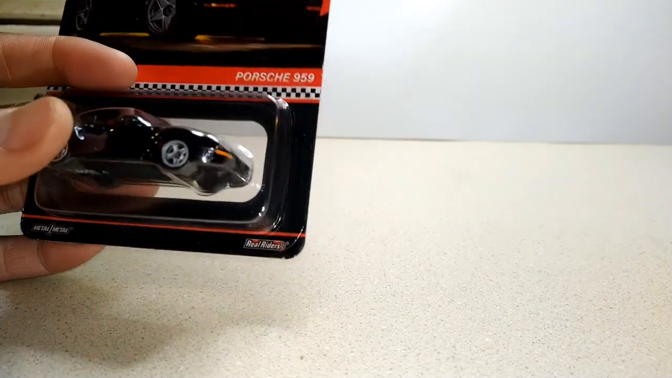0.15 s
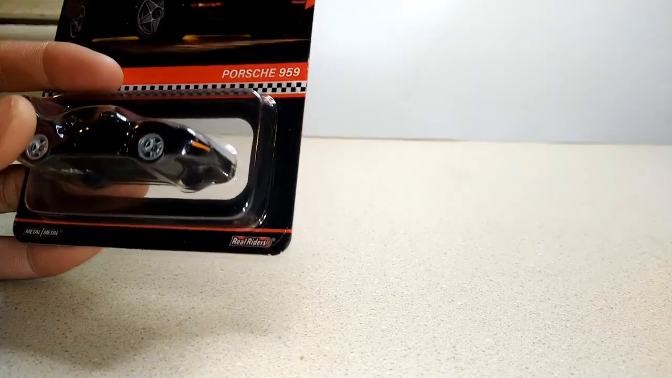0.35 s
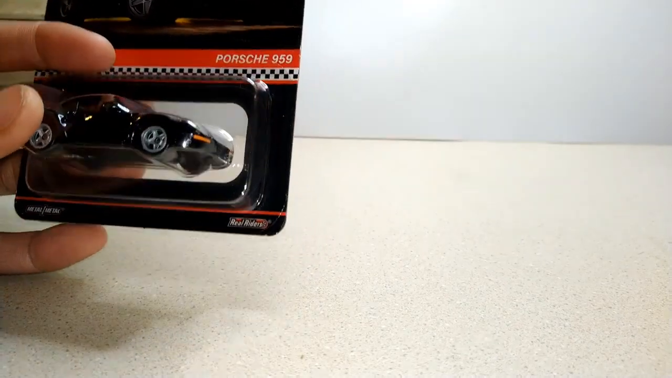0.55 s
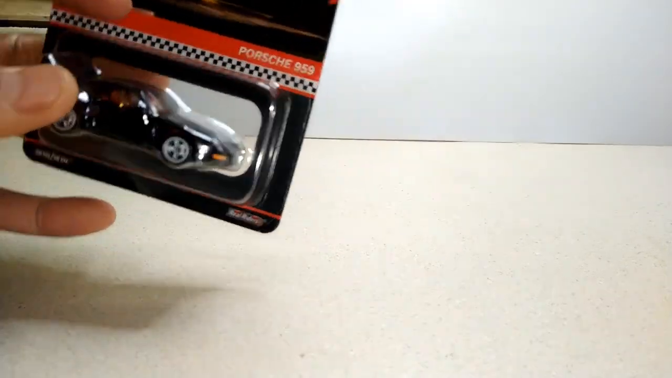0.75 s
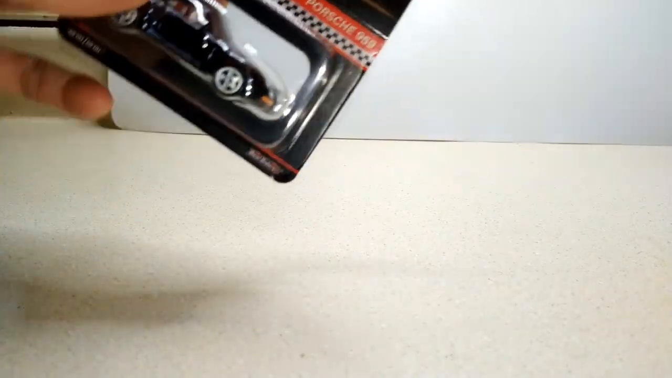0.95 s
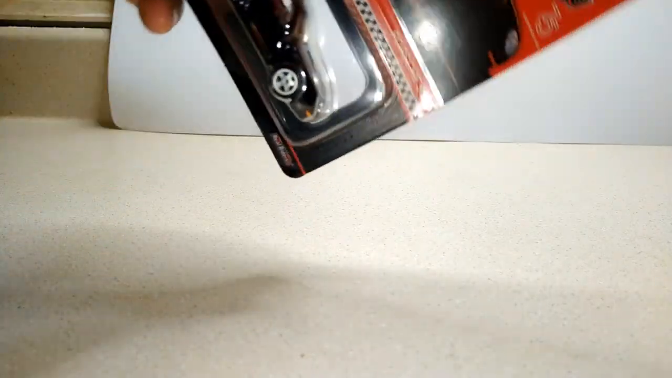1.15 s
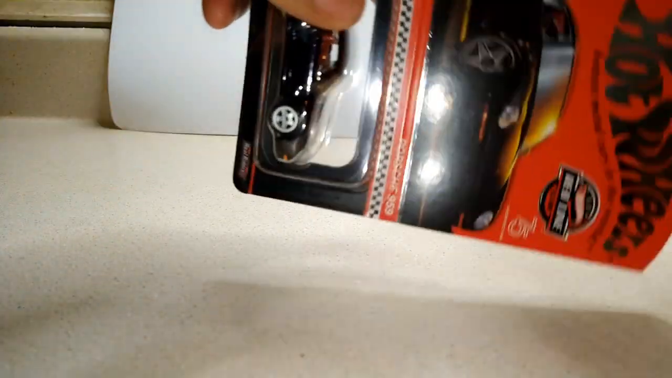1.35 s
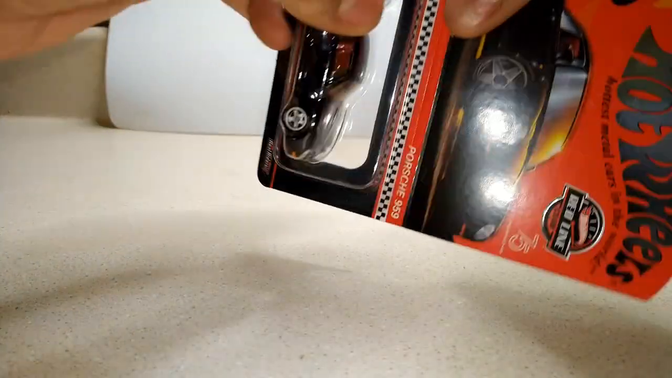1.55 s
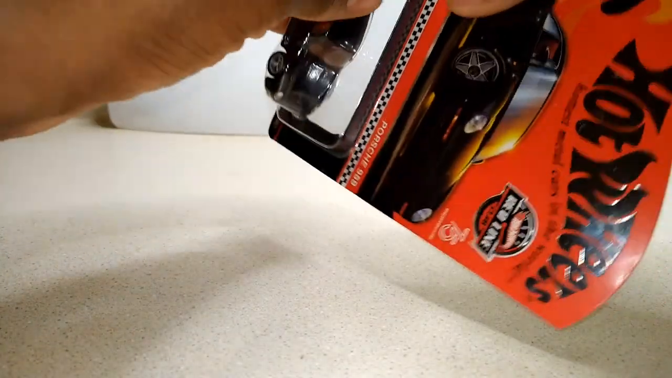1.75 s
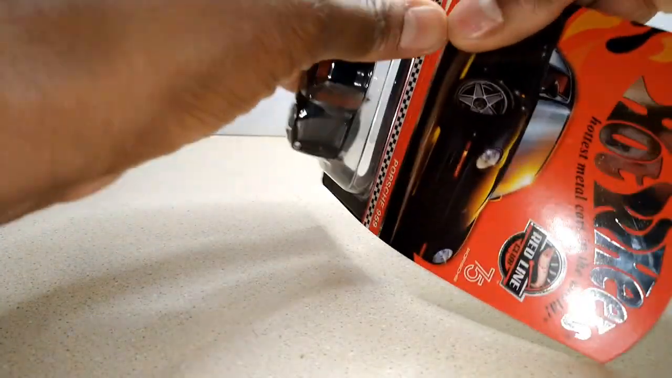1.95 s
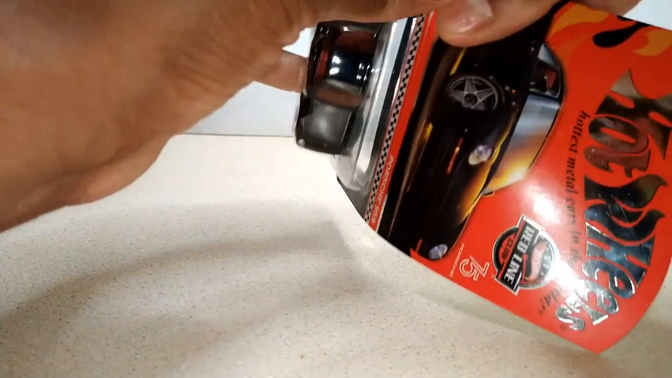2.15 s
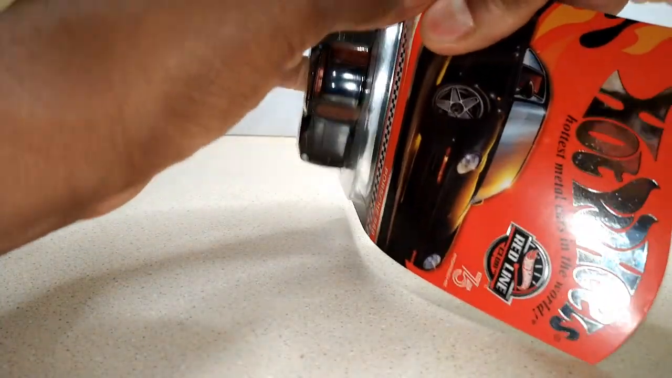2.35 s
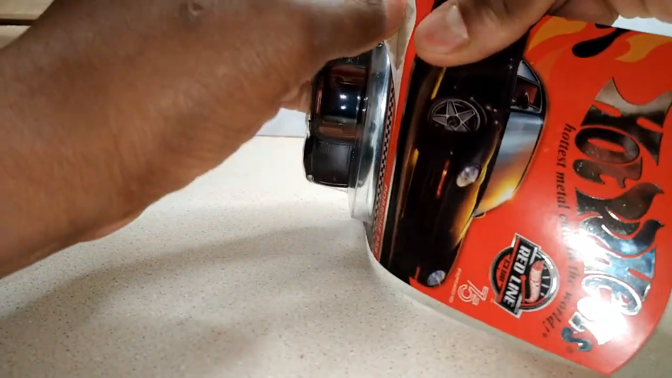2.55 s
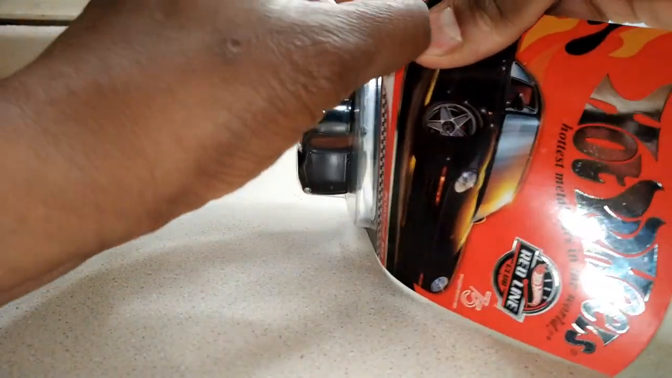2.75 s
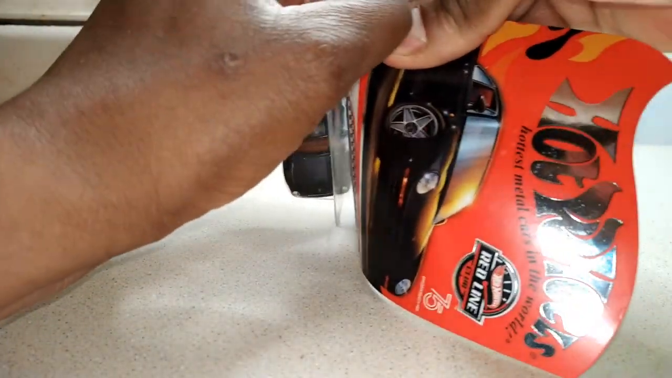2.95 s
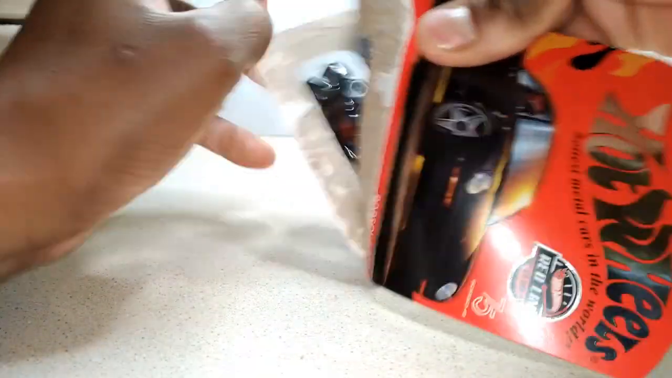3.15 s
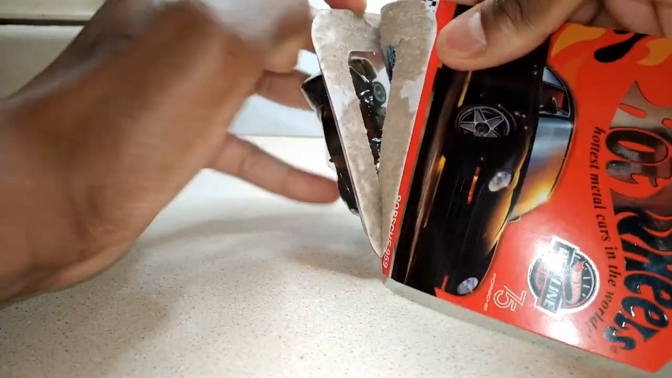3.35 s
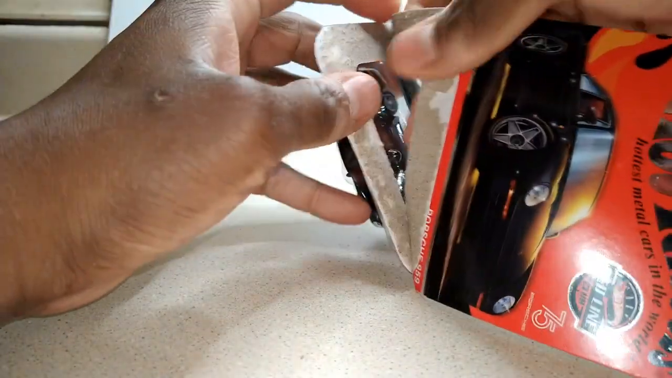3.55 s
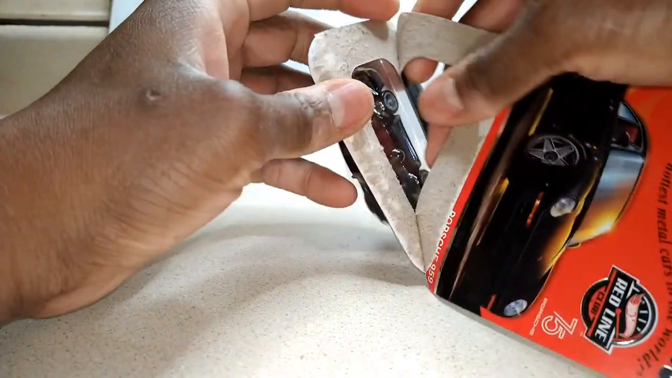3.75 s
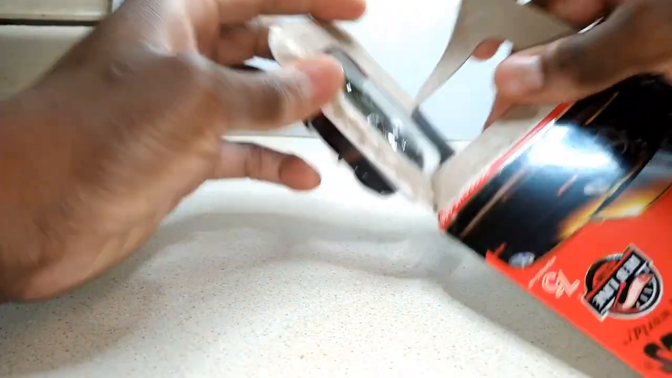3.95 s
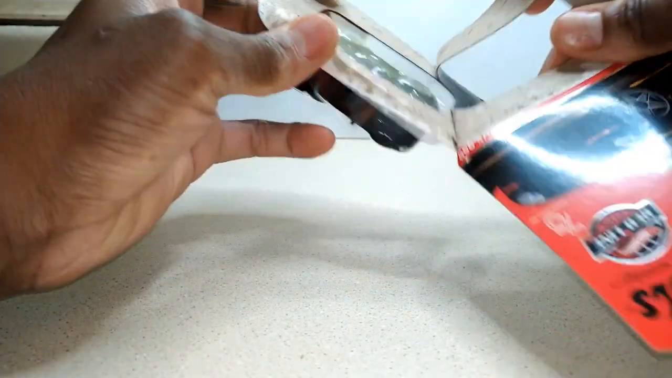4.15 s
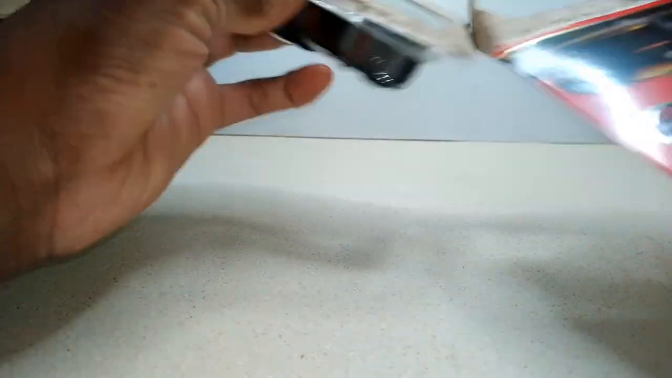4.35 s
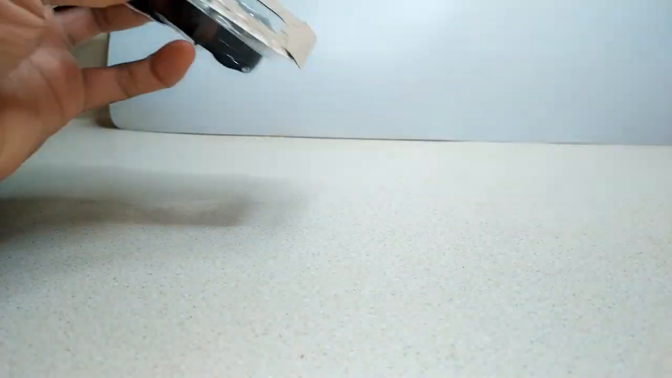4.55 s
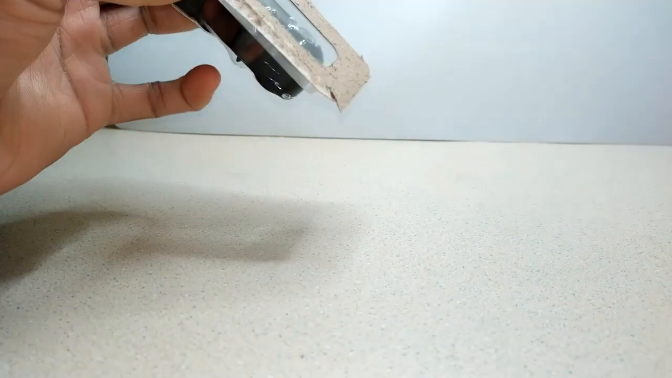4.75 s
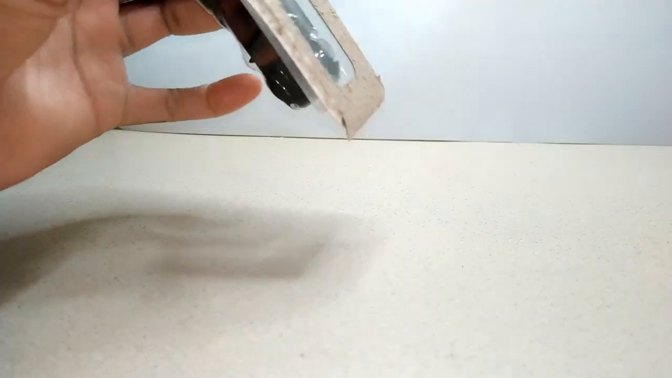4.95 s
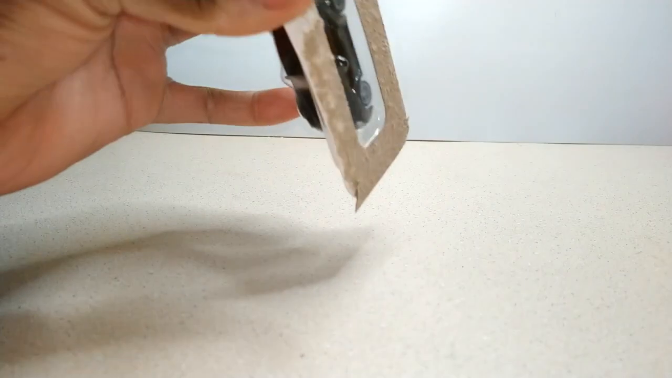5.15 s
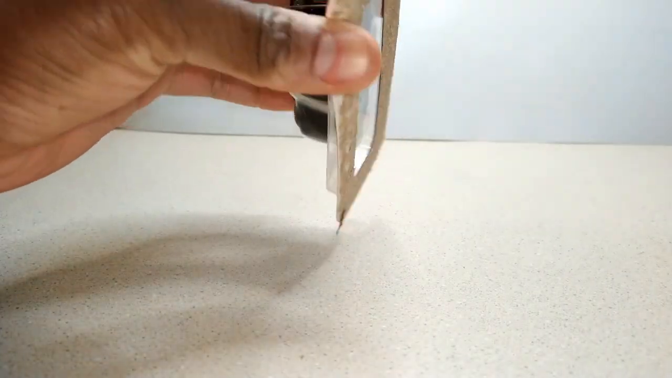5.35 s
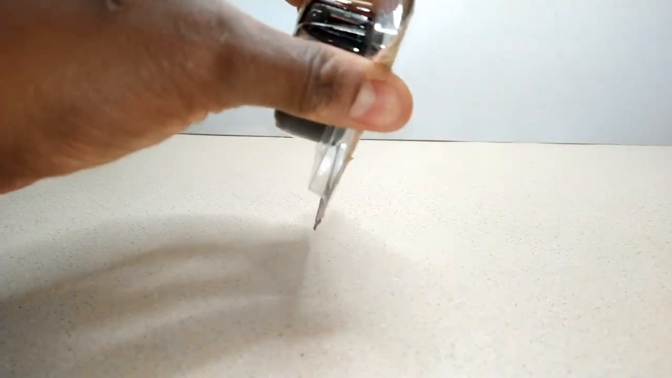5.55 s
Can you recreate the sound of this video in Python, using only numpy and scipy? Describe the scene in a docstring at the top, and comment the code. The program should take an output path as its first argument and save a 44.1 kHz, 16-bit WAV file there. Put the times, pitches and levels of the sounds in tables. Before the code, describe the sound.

Stiff plastic pops and crackles in bursts as glued cardboard rips by hand, a small toy knocking inside its shell, over faint room hum.

```python
"""Hands turn a carded blister pack close to a two-port microphone, over the low hum and hiss of a quiet room.
First a faint rub, then buckling plastic snaps (noise bursts through resonances), and the toy knocks the shell
(struck decaying modes). Snaps then crowd together while fingers rub the card and glued paper rips in random grains.
Near four seconds the shell is off and the card's lowest resonance weakens; loud snaps and a short rip follow.
Sparser snaps and rubbing end the scene. Thumps of the hands and card are damped sines."""
import sys
import numpy as np
from scipy import signal
from scipy.fft import rfft, irfft, next_fast_len
from scipy.io import wavfile
from scipy.ndimage import map_coordinates

SR = 44100
rng = np.random.default_rng(int(sys.argv[2]) if len(sys.argv) > 2 else 0)


def linear_from_db(decibels):
    """Turn decibels (scalar or array-like) into linear amplitude factors; 0 gives 1."""
    return 10 ** (np.asarray(decibels, float) / 20)


def output_pcm(signal):
    """Save a mono or channel-first signal as 16-bit PCM at the path in sys.argv[1].

    Samples are clipped to [-1, 1] before scaling.
    """
    pcm = np.clip(np.atleast_2d(signal).T, -1, 1) * 32767
    wavfile.write(sys.argv[1], SR, np.round(pcm).astype(np.int16))


N = 246959  # samples, 5.6 s


def unit_rms(x):
    """Energy normalisation: scales a signal to rms 1."""
    return x / np.sqrt(np.mean(x ** 2) + 1e-20)


def unit_peak(x):
    """Peak normalisation: the rms over both channels peaks at 1 in each event."""
    power = np.mean(x ** 2, axis=1)
    return x / np.sqrt(power.max(-1))[:, None, None]


def spectrum_gain(points, hz):
    """Spectral shaping: gain of (frequency [Hz], level [dB]) points on a log axis, -120 dB outside them."""
    f, level_db = np.transpose(points)
    return linear_from_db(np.interp(np.log(hz + 1), np.log(f + 1), level_db, -120, -120))


def modes(table, f):
    """Modal superposition: damped resonances (centre [Hz], width [Hz], level [dB]) of alternating sign."""
    total = 0
    for k, (centre, width, db) in enumerate(table):
        resonance = 1j * f * width / (centre * centre - f * f + 1j * f * width)
        total = total + (-1) ** k * linear_from_db(db) * resonance
    return total


# treble resonances of the left and the right microphone port: (centre [Hz], width [Hz], level [dB])
PORT_MODES = [
    [(6566, 750, 11), (4550, 4100, -3.5)],
    [(5040, 665, 10.5), (5930, 2750, -6.5)],
]


def ports(f, skirt_db):
    """Port resonance: each port lifts its own treble band over a flat skirt."""
    return np.array([modes(port, f) + linear_from_db(skirt_db) for port in PORT_MODES])


def curves(rows):
    """Linear interpolation: one value per sample for each column after the time."""
    s, *columns = np.transpose(rows)
    return [np.interp(np.arange(N) / SR, s, column) for column in columns]


def wobble(rate):
    """Slow random modulation: a smooth curve through random knots, rate knots a second."""
    knots = rng.standard_normal(int(N * rate / SR) + 4)
    return map_coordinates(knots, [np.arange(N) * rate / SR])


def filtered(x, response):
    """Linear filtering: the spectrum times a complex response of frequency."""
    n = x.shape[-1]
    m = next_fast_len(n + 2048)
    return irfft(rfft(x, m) * response(np.fft.rfftfreq(m, 1 / SR)), m)[..., :n]


def noise_pair(shape, alike):
    """Partial coherence: left and right noise whose correlation is alike."""
    a, b = rng.standard_normal((*shape[:-1], 2, shape[-1])).swapaxes(0, -2)
    angle = np.arccos(np.clip(alike, -1, 1)) / 2
    shared, apart = np.cos(angle) * a, np.sin(angle) * b
    return np.stack([shared + apart, shared - apart], -2)


def sides(pan_db):
    """Interaural level difference: left and right gains that share a left-right difference."""
    axis = -2 if np.ndim(pan_db) > 1 else 0
    return linear_from_db(np.stack([pan_db, -pan_db], axis) / 2)


def place(times, sounds):
    """Superposition: sums stereo events at their times."""
    out = np.zeros((2, N + sounds.shape[-1]))
    for s, x in zip(times, sounds):
        out[:, round(s * SR):][:, :x.shape[-1]] += x
    return out[:, :N]


def burst(count, crack_s, near_db, near_s, room_db, room_s, alike):
    """Direct sound and reverberation: a crack, echoes off hands and table, a new room tail for every event."""
    t = np.arange(SR // 6) / SR
    # each decay time [s] spans 60 dB
    crack = noise_pair((count, len(t)), alike) * linear_from_db(-60 * t / crack_s)
    echoes = linear_from_db(near_db - 60 * t / near_s) + linear_from_db(room_db - 60 * t / room_s)
    onset = 1 - np.exp(-t / 0.00074)
    return crack + noise_pair((count, len(t)), alike ** 4) * echoes * onset


# snaps of the plastic: (time [s], click level [dB], card body re click [dB],
# pitch of the buckled patch [Hz], left-right difference [dB])
SNAP_EVENTS = [(0.1741, -57, -2, 590, -2.5), (0.4249, -60, 0, 552, -6), (0.616, -38, -2, 466, -5.5),
               (0.6759, -16, -20.5, 501, -3.5), (0.6796, -18, -15, 1930, 0.5), (0.6944, -30, -16, 501, -7),
               (0.7044, -34, -10, 546, -6), (1.2475, -47.5, 6.5, 2000, -4),
               (1.3469, -33.5, -9.5, 501, -7.5), (1.3569, -34, -11, 530, -10.5),
               (1.437, -55.5, -2, 726, -1.5), (1.5334, -42.5, -9, 692, -3.5), (1.5655, -41, -16, 614, -5.5),
               (1.5754, -44, -1.5, 546, -1), (1.6226, -25, -7, 676, -1.5), (1.6998, -42, -15, 778, -5),
               (1.7054, -35.5, -29, 775, 0.5), (1.7724, -50.5, -4, 1420, 6),
               (1.8451, -46.5, 5.5, 1770, 3.5), (1.862, -45, -11, 1500, 4), (1.9203, -52, 7, 1130, 4),
               (1.9401, -33, -26, 872, 2), (1.9544, -33.5, -12, 750, 4), (1.9637, -33, -17, 1130, -2.5),
               (1.9855, -39, -9.5, 1120, -2.5), (1.9967, -37, -15, 1020, -2.5), (2.0453, -35, -23, 1880, 1),
               (2.1156, -26.5, -23, 1890, 2), (2.1284, -31, -11.5, 755, -0.5),
               (2.1503, -33.5, -14, 780, -1.5), (2.1669, -34.5, -11.5, 735, 2.5),
               (2.1819, -32, -10, 1880, 0.5), (2.1949, -31.5, -12, 820, -0.5),
               (2.2068, -24.5, -12, 505, -3), (2.225, -29.5, -19, 665, -0.5),
               (2.2459, -29.5, -11.5, 496, -2), (2.392, -27, -21.5, 1750, 2.5),
               (2.4356, -30.5, -21, 1890, 1), (2.5262, -28, -17, 1490, -0.5),
               (2.5364, -41, -5.5, 501, -6.5), (2.601, -24.5, -24, 830, -1.0),
               (2.671, -44, -12, 1120, -2.5), (2.693, -34.5, -14, 1900, -14.5),
               (2.7002, -32, -24, 1070, -12.5), (2.705, -35.5, -29, 1850, -7.5),
               (2.7134, -37, -31, 1090, -5), (2.7227, -31, -21, 2070, -5), (2.7316, -30.5, -26, 1090, -7),
               (2.747, -32, -26, 1900, -9), (2.7633, -32, -27, 807, -7.5),
               (2.7767, -31.5, -11.5, 760, -3.5), (2.8015, -44, -4, 600, -2), (2.823, -31, -25, 807, -12),
               (2.834, -33.5, -17, 725, -6.5), (2.8684, -40, -2.5, 530, -3.5), (2.9569, -33.5, -8, 870, -1),
               (3.102, -23, -22, 510, 3), (3.1204, -22.5, -15.5, 940, -1), (3.138, -34, -3, 1070, -6),
               (3.2018, -36, -1, 1120, -1.5), (3.2548, -29, -7, 726, -1.5), (3.2854, -33, 4.5, 810, 0.5),
               (3.3294, -52, -9, 677, 5), (3.3551, -31, -4, 1080, 7), (3.4705, -44, -5, 1300, -1),
               (3.5907, -36, -1.5, 715, -0.5), (3.6566, -47.5, 0, 600, 6), (3.695, -38, -3.5, 760, -0.5),
               (3.797, -44, -9, 1150, -5.5), (3.8102, -41, -3, 1170, 0), (3.8347, -36.5, -15.5, 573, -1.5),
               (3.8538, -46, -5, 690, 0.5), (3.8778, -33, -7, 600, 0.5), (3.9652, -29.5, 5, 732, 2.5),
               (3.9823, -16.5, -22, 1130, -2), (4.0065, -24.5, 4, 1260, 2.5),
               (4.1205, -48.5, -7, 1196, -1.5), (4.1326, -41, -12, 1100, 0), (4.1915, -35, -15, 845, 3.5),
               (4.2302, -34.5, -20, 784, 6.5), (4.3594, -58, -3, 616, 5), (4.422, -23, -24, 2170, 7),
               (4.4301, -20, -15.5, 1560, 5.5), (4.4444, -29.5, -6, 797, -1.5),
               (4.6705, -46, -0.5, 1940, -6.5), (4.8219, -52, -9, 1230, -2), (4.842, -40, -39, 1910, -2.5),
               (4.8855, -53.5, 1, 1300, 5.5), (4.9404, -45, -23, 1630, 8.5), (4.962, -45, -11, 1210, 9.5),
               (4.9772, -34.5, -9, 2820, 5.0), (4.9927, -39.5, -9.5, 730, 10), (5.1387, -46.5, -1, 1870, 4),
               (5.172, -49, -13, 610, 6), (5.2106, -46, -0.5, 1830, 7.5), (5.4238, -40.5, -11, 1770, 4),
               (5.5079, -33, -9.5, 1700, 6), (5.5433, -41, -13.5, 659, 10.5), (5.5835, -46, -14, 1100, 2)]
# dryness of the parting surfaces and place of the hands:
# (time [s], top end of the rip re its treble [dB], left-right difference [dB])
GRIP_PATH = [(0, -19, -3), (.6, -24, -1), (1.36, -32, -0.5), (1.6, -21.5, 5), (2.2, -22.5, 1),
             (2.43, -12, 5.5), (2.7, -27, 1), (3.0, -8.5, 3.5), (3.13, -14, 3), (3.3, -21.5, 3),
             (3.95, -15, 1.5), (4.3, -16.5, 4.5), (4.428, -17, 5), (4.7, -21, 0.5), (5.0, -17.5, 11),
             (5.6, -23, 7)]
# resonances of the flexed card: (centre [Hz], width [Hz], level [dB])
CARD_MODES = [(288, 134, 2.5), (689, 246, 1.5), (1130, 160, 0), (1917, 1170, -4), (2580, 3000, -13.5)]
# treble of paper and plastic: (frequency [Hz], relative level [dB])
FIBRE_SPECTRUM = [(2200, -4.5), (2900, -5), (3700, 4), (6000, 0.5), (8000, -3.5), (9500, -11.5),
                  (11000, -111)]
# brightest edge of the sound: (frequency [Hz], relative level [dB])
TOP_SPECTRUM = [(7500, -12), (9500, 13.5), (12500, 8), (15300, 3.5), (15600, -26)]
SNAP_DULLER_DB, SNAP_SCATTER_DB = -3.5, 4  # top end of a snap under that of the rip, and its scatter
PEELED_S = 3.9  # the shell is off


def snaps():
    """Snap-through buckling: a click through the ports, a thud in the card and the buckled patch."""
    s, db, body_db, hz, pan_db = np.transpose(SNAP_EVENTS)[..., None, None]
    grip_s, dry_db, _ = np.transpose(GRIP_PATH)
    scatter_db = SNAP_SCATTER_DB * rng.standard_normal(s.shape)
    top_db = np.interp(s, grip_s, dry_db) + SNAP_DULLER_DB + scatter_db

    # arrival times differ between the ports with the left-right difference
    lag_s = (1.2e-4 - 5e-5 * pan_db) * [[.5], [-.5]]
    later = lambda f: np.exp(-2j * np.pi * f * lag_s)

    blow = burst(count=len(s), crack_s=.006, near_db=-14, near_s=.022, room_db=-40, room_s=.22, alike=.6)
    click = unit_peak(filtered(blow, lambda f: later(f) * ports(f, -12.5) * spectrum_gain(FIBRE_SPECTRUM, f)))
    # the top end takes twice the lag
    top = unit_peak(filtered(blow, lambda f: later(f) ** 2 * spectrum_gain(TOP_SPECTRUM, f)))

    # a snap at the card's edge radiates little bass, and still less once the shell is off
    edge_hz = np.where(s < PEELED_S, 210, 420)
    radiated = lambda f: (1j * f / (edge_hz + 1j * f)) ** 2
    patch = [(hz, 0.26 * hz, 7)]
    push = burst(count=len(s), crack_s=.009, near_db=-12, near_s=.04, room_db=-38, room_s=.2, alike=.97)
    body = unit_peak(filtered(push, lambda f: later(f) * radiated(f) * (modes(CARD_MODES, f) + modes(patch, f))))

    mix = click + linear_from_db(top_db) * top + linear_from_db(body_db) * body
    return place(s.ravel(), mix * linear_from_db(db) * sides(pan_db[:, 0]))


def rip():
    """Fracture noise and friction: paper fibres part and skin drags; the card radiates the lower share."""
    loud, low = strokes()
    top_db, pan_db = curves(GRIP_PATH)
    fibres = grains(660, 1.73, 5.8, alike=0.1)
    crackle = unit_rms(filtered(fibres, lambda f: ports(f, -0.5) * spectrum_gain(FIBRE_SPECTRUM, f)))
    top = unit_rms(filtered(fibres, lambda f: spectrum_gain(TOP_SPECTRUM, f)))
    return sides(pan_db) * loud * (crackle + linear_from_db(top_db) * top) + low * card_crackle()


# strokes of rubbing and ripping: (time of the crest [s], crest level [dB], rise over 20 dB [s],
# fall over 20 dB [s], card body re crest [dB])
STROKE_EVENTS = [(.284, -65.5, 1, 0.64, -12.5), (0.624, -67.5, 0.0074, 0.032, 15.5),
                 (.69, -45.5, 0.011, 0.066, -4), (1.25, -62, 0.3, 0.22, -12), (1.358, -58, 0.018, 0.086, 2),
                 (1.56, -54.5, 0.042, 0.15, -2.5), (1.675, -52.5, 0.08, 0.056, 2.5),
                 (1.735, -55.5, 0.046, 0.04, -0.5), (1.864, -57.5, 0.17, 0.14, -10),
                 (1.967, -48, 0.045, 0.068, -7), (2.122, -55.5, 0.18, 0.19, -6.5),
                 (2.213, -47, 0.037, 0.068, -3.5), (2.425, -49, 0.094, 0.17, -14),
                 (2.54, -64, 0.13, 0.093, 6), (2.615, -56.5, 0.036, 0.25, -5),
                 (2.712, -57.5, 0.041, 0.17, 1), (2.833, -51.5, 0.13, 0.24, -4.5),
                 (3.102, -35, 0.093, 0.13, -19.5), (3.137, -33, 0.047, 0.1, -7),
                 (3.208, -45, 0.062, 0.022, -4.5), (3.302, -48, 0.15, .12, -2),
                 (3.355, -45.5, 0.082, 0.03, -7), (3.485, -55, 0.057, .12, -6),
                 (3.584, -48.5, 0.092, 0.16, -5), (3.69, -60, 0.11, 0.024, -5),
                 (3.81, -55.5, 0.15, 0.16, -1.5), (3.921, -39.5, 0.037, 0.18, -21),
                 (3.972, -38, 0.079, 0.086, -4), (4.13, -62, 0.02, 0.45, -1),
                 (4.264, -45.5, 0.21, 0.094, -11), (4.434, -29, 0.032, 0.031, -12.5),
                 (4.57, -57.5, 0.6, 0.082, -8), (4.85, -63, 0.52, 0.2, -7.5),
                 (4.988, -44.5, 0.014, 0.051, -14), (5.03, -52, 0.03, 0.031, -21),
                 (5.217, -60, 0.17, 0.066, -3.5), (5.439, -49.5, 0.021, 0.04, -10.5),
                 (5.512, -56, 0.013, 0.035, -3.5), (5.56, -63.5, .1, .4, -1)]
CREST = 0.93  # exponent of the rise and fall, the roundness of a crest
REST_DB, REST_BODY_DB = -76.5, -133  # faint rub and card between strokes


def strokes():
    """Amplitude envelope: strokes swell and die away, adding in power; gives loudness of fibres and card."""
    t = np.arange(0, N + 64, 64) / SR
    fibres, card = linear_from_db(REST_DB), linear_from_db(REST_BODY_DB)
    for s, db, rise_s, fall_s, body_db in STROKE_EVENTS:
        distance = np.maximum((s - t) / rise_s, (t - s) / fall_s)
        swell = linear_from_db(db - 20 * distance ** CREST)
        fibres = np.hypot(fibres, swell)
        card = np.hypot(card, linear_from_db(body_db) * swell)
    return curves(np.transpose([t, fibres, card]))


def grains(per_s, spread_db, smooth_db, alike):
    """Shot noise: clumped fibre breaks of scattered size over a smooth rub."""
    chance = per_s / SR * linear_from_db(4 * wobble(90))
    breaks = (rng.random(N) < chance) * linear_from_db(spread_db * rng.exponential(size=N))
    decay = linear_from_db(-60 * np.arange(300) / SR / .006)
    spikes = np.convolve(breaks, decay)[:N]
    rub = linear_from_db(smooth_db + 1.5 * wobble(45))
    return (unit_rms(spikes) + rub) * noise_pair((N,), alike)


def card_crackle():
    """Modal excitation: each card resonance has its own sparse pops, so the crackle changes pitch."""
    pops = []
    for mode in CARD_MODES:
        pops.append(filtered(grains(70, 3, -1, alike=.9), lambda f: modes([mode], f) * (f < 6000)))
    # once the shell is off, the lowest resonance weakens by 13 dB
    lowest_gain = np.where(np.arange(N) < PEELED_S * SR, 1, linear_from_db(-13))
    return unit_rms(pops[0] * lowest_gain + sum(pops[1:]))


# knocks on the hollow shell: (time [s], peak level [dB], pitch, which the grip changes [Hz])
KNOCK_EVENTS = [(0.279, -60.5, 344), (0.424, -46, 312), (0.616, -41, 292), (0.676, -36.5, 304),
                (0.695, -44, 378), (1.244, -50.5, 372), (1.348, -40, 298), (1.666, -59, 260),
                (2.078, -46, 309), (2.206, -39.5, 330), (2.221, -40, 317), (2.496, -49, 319),
                (2.535, -43.5, 310), (2.958, -52.5, 265), (3.103, -46, 362), (3.167, -46, 252),
                (3.245, -49, 337), (3.285, -48, 326), (3.538, -54.5, 203), (4.002, -38, 443),
                (4.43, -43, 427.5), (4.991, -49.5, 204), (5.164, -52.5, 348), (5.213, -57, 387),
                (5.429, -54, 280)]
# shell overtone and thud: (frequency re pitch [ratio], width re pitch [ratio], level [dB])
SHELL_MODES = [(1.432, 0.13, -4), (1.1, 0.86, -11.5)]
SHELL_T60_S = .13  # decay time of the shell's main mode


def knocks():
    """Impulse response: the toy taps the shell and rattles briefly against it; the shell rings low."""
    s, db, hz = np.transpose(KNOCK_EVENTS)[..., None, None]
    t = np.arange(SR // 4) / SR
    tap = t == 0
    rattle = noise_pair((len(s), len(t)), 0.72) * linear_from_db(-29 - 60 * t / 0.2)
    width = np.log(1000) / np.pi / SHELL_T60_S  # bandwidth [Hz] of a mode with that decay time
    shell = [(hz, width, 4)]
    shell += [(hz * ratio, hz * share, level) for ratio, share, level in SHELL_MODES]
    ring = unit_peak(filtered(rattle + tap, lambda f: modes(shell, f) / (1 + 1j * f / 600)))
    return place(s.ravel(), linear_from_db(db) * ring)


# thumps of the hands and the flapping card:
# (time [s], level before decay and scatter [dB], pitch [Hz])
THUMP_EVENTS = [(1.569, -41, 55), (2.524, -40.5, 103), (2.956, -47, 123), (3.17, -43, 60.7),
                (3.285, -34.5, 104), (3.584, -43.5, 133), (3.799, -46.5, 80), (4.428, -44, 119),
                (4.991, -42.5, 168), (5.168, -50, 133)]


def thumps():
    """Damped oscillation: one low push that dies within a few cycles."""
    s, db, hz = np.transpose(THUMP_EVENTS)[..., None]
    cycles = hz * np.arange(SR // 8) / SR
    push = linear_from_db(db) * np.sin(2 * np.pi * cycles) * np.exp(-cycles / 0.86)
    scatter = linear_from_db(1.8 * rng.standard_normal((len(s), 2, 1)))
    return place(s[:, 0], push[:, None] * scatter)


# low sound of the room and of the moving hands: (time [s], level [dB])
LOW_LEVELS = [(0.0, -62.5), (0.84, -62.5), (2.57, -65), (3.35, -64), (4.12, -68), (4.4, -65), (4.64, -70),
              (5.5, -63)]
# spectrum of the hum: (frequency [Hz], relative level [dB])
HUM_SPECTRUM = [(20, -5), (45, -14), (60, -10), (75, 2.5), (95, -11.5), (150, -11), (180, -21),
                (260, -24.5)]
# spectrum of the hiss: (frequency [Hz], relative level [dB])
HISS_SPECTRUM = [(120, -46), (200, -4.5), (488, -2.5), (665, -12), (2380, -13.5), (5010, -15.5),
                 (6590, -14.5), (8820, -25.5), (11800, -21), (13400, -46), (15500, -55.5)]
HISS_DB = -75


def room():
    """Spatial coherence: a wavering low hum is nearly alike in both ports, the hiss almost unrelated."""
    hum = unit_rms(filtered(noise_pair((N,), 0.94), lambda f: spectrum_gain(HUM_SPECTRUM, f)))
    hiss = unit_rms(filtered(noise_pair((N,), 0.017), lambda f: spectrum_gain(HISS_SPECTRUM, f)))
    return linear_from_db(curves(LOW_LEVELS)[0]) * hum + linear_from_db(HISS_DB) * hiss


LEFT_LAG_S = 0.00021  # sound from in front reaches the left port later


def scene():
    """Superposition and propagation delay: everything the ports hear."""
    low = knocks() + thumps() + room()
    left_later = lambda f: np.exp(-2j * np.pi * f * LEFT_LAG_S * np.array([[1], [0]]))
    return snaps() + rip() + filtered(low, left_later)


def top_cut(x):
    """Nothing passes above the cut-off."""
    return signal.sosfilt(signal.butter(12, 16410, fs=SR, output="sos"), x)


LOW_CUT_HZ, TOP_HZ = 17.4, 15500  # the microphone's bass roll-off; the band limit


def record(dry):
    """Band limiting: a first-order bass roll-off and a sharp upper limit."""
    limited = filtered(dry, lambda f: (f < TOP_HZ) * 1j * f / (LOW_CUT_HZ + 1j * f))
    return top_cut(limited)


dry = scene()
out = record(dry)
output_pcm(out)
```